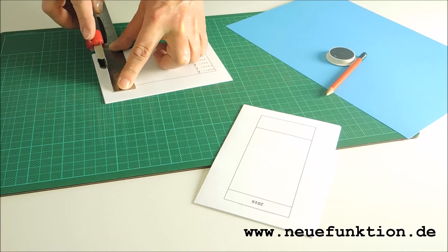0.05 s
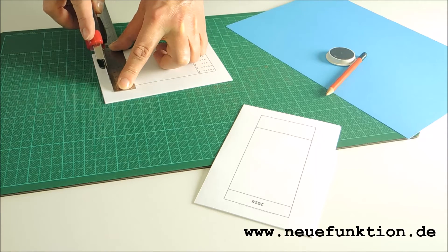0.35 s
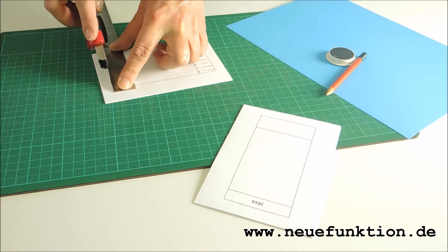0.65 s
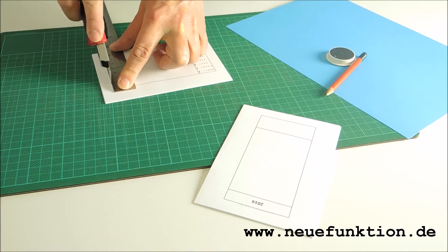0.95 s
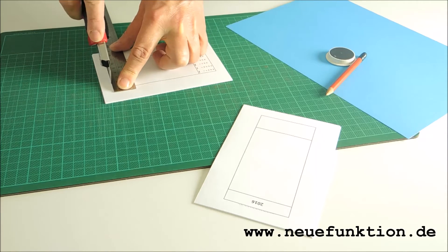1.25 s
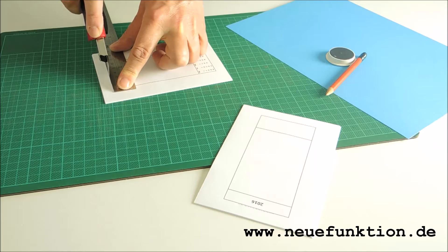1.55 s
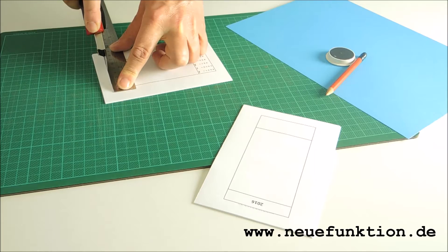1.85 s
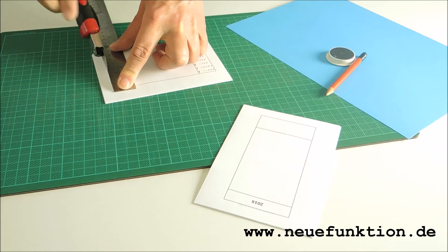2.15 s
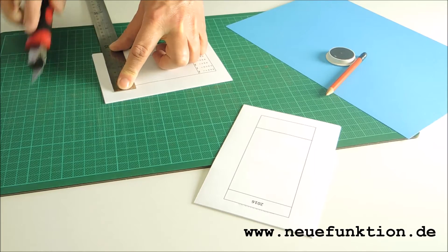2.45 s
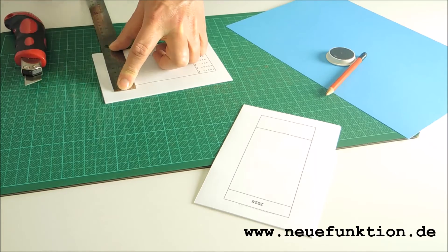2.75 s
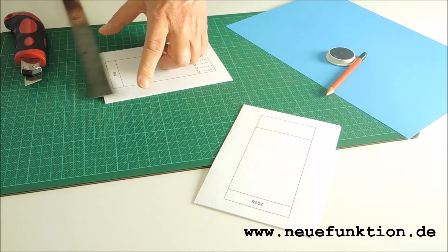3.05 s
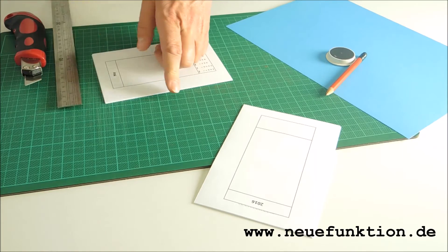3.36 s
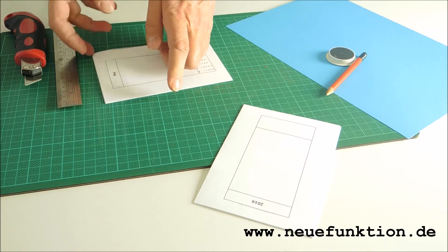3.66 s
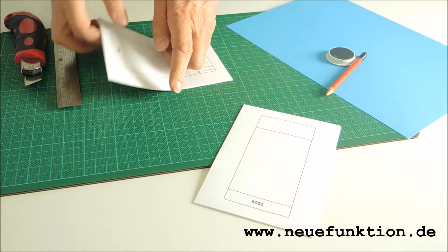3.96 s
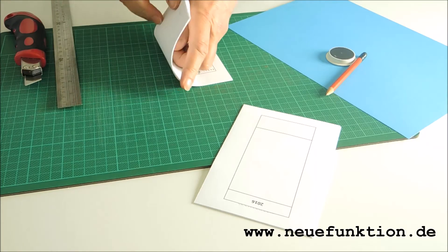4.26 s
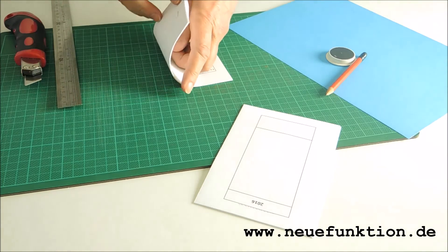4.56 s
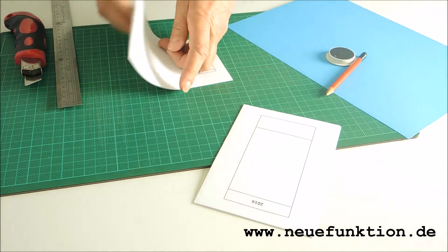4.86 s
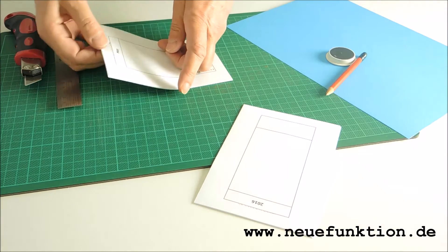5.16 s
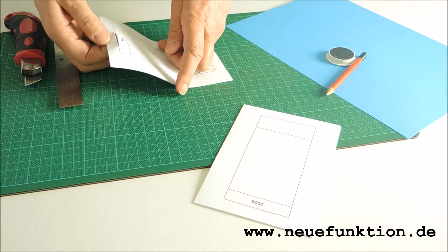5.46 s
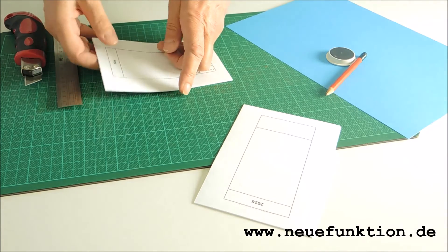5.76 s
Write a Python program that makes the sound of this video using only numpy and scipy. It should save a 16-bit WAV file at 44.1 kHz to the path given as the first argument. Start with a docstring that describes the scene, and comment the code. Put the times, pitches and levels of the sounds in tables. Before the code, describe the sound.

After a few light taps, a utility knife is drawn faintly through paper along a steel ruler. Blade and handle click, then the knife is put down on a cutting mat with a sharp knock that briefly rings the table. The ruler slides aside, rubbing and juddering. The sheet is bent over with two small snaps, crackles and soft finger rustles. The stereo microphone is close, in a lightly echoing room with a fan humming to the left.

```python
"""A small stereo microphone close to a cutting mat, in a lightly echoing room with a fan humming to the left.
After a few light taps a utility knife is drawn along a steel ruler, parting the fibres of a paper sheet.
It bumps off the edge, blade and handle clicking, and is put down at 2.8 s with a knock that rings the table.
The ruler is slid aside, rubbing and juddering. From about 3.9 s the sheet is lifted and bent over:
it snaps free twice, crackles, and rustles under the fingers."""
import sys
import numpy as np
from scipy import signal
from scipy.fft import rfft, irfft
from scipy.io import wavfile

SR = 44100
rng = np.random.default_rng(int(sys.argv[2]) if len(sys.argv) > 2 else 0)


def put_to_file(sound):
    """Save the sound as 16-bit audio at rate SR, in the file named by the first command-line argument."""
    columns = np.atleast_2d(sound).T  # one column per channel
    safe = np.clip(columns, -1, 1)
    whole_steps = np.round(safe * 32767)
    wavfile.write(sys.argv[1], SR, whole_steps.astype(np.int16))


N = 256662
T = np.arange(N) / SR
F = np.fft.rfftfreq(2 * N, 1 / SR)

# room tone, the fan's rush of air: (frequency [Hz], relative level [dB])
FAN_AIR = [(20, -34), (50, -10), (80, -3), (110, -2), (190, -2.5), (270, -2), (400, -6), (800, -5),
           (1500, -5.5), (2000, -10.5), (2800, -13), (4700, -18), (13000, -18), (16000, -20.5)]
# fan and motor lines: (frequency [Hz], level [dB])
FAN_HUM = [(75.2, -71.5), (107.7, -105), (149.5, -75), (297, -73)]
# the fan's whine: (frequency [Hz], width [Hz], relative level [dB])
FAN_WHINE = [(747, 36, 0.5), (3859, 76, -4), (3994, 84, -10.5)]
# wall echoes: (frequency [Hz], relative level [dB], t60 [s])
ROOM_ECHO = [(60, -12, 0.42), (202, 3.5, 0.66), (400, 3, 0.46), (1200, 0.5, 0.44), (2500, -1, 0.42),
             (5500, -7, 0.39), (10000, -9.5, 0.32), (16000, -9.5, 0.27)]
# microphone ports: (frequency [Hz], left minus right [dB], left lead [rad])
MIC_PORTS = [(100, 0, 0.056), (550, 1.5, 0.17), (1100, 0.5, 0.65), (2190, -3, 0.3), (4500, -3, 0.9),
             (7500, -0.5, 0.74), (10300, -6, 0.9), (13000, -9.5, 1.8), (15700, 9, 1.9)]

# rustle of the sheet: (frequency [Hz], relative level [dB])
PAPER_SPECTRUM = [(30, -40), (200, -15), (900, -22), (1700, -16), (3300, -11), (5200, -7), (7000, -3.5),
                  (8500, 1.5), (10500, 2.5), (12300, 4), (14000, 1), (16000, -6.5)]
# resonances of the curved sheet: (frequency [Hz], width [Hz], relative level [dB])
FLEX_MODES = [(2400, 270, 1), (2540, 200, -4), (4230, 610, -0.5)]
# the sheet slips until it snaps free: (time [s], length [s], snap level [dB], flex re snap [dB])
SHEET_SLIPS = [(3.961, 0.0403, -42.5, -7.5), (4.089, .039, -42, -11.5)]
# crackles of the bending sheet: (time [s], level [dB])
SHEET_CRACKLES = [(3.96, -43), (4.030, -47.5), (4.046, -50), (4.078, -41), (4.093, -52), (4.123, -46),
                  (4.179, -51), (4.369, -56)]
# fingers brushing the sheet: (time [s], length [s], level [dB])
FINGER_BRUSHES = [(3.906, 0.21, -57.5), (4.108, .09, -59), (4.349, 0.077, -64.5), (4.408, 0.093, -61.5),
                  (4.618, 0.16, -67.5), (4.991, 0.095, -60), (5.05, 0.15, -58.5), (5.174, 0.15, -66),
                  (5.336, 0.085, -58), (5.48, 0.082, -70), (5.804, .06, -58.5)]
# skin on paper: (frequency [Hz], relative level [dB])
SKIN_SPECTRUM = [(30, -40), (900, -28), (2500, -4), (4500, -1.5), (7000, -4), (9500, 1.5), (12300, 4.5),
                 (14000, -1), (16000, -5)]

# the hand's push on the ruler: (time [s], sliding effort [dB])
RULER_PUSH = [(3.05, -64), (3.084, -58.5), (3.1, -65), (3.114, -52.5), (3.218, -43), (3.252, -47),
              (3.298, -46), (3.388, -62), (3.43, -87)]
# steel rubbing on paper: (frequency [Hz], relative level [dB])
RUB_SPECTRUM = [(30, -30), (130, 2), (250, 3), (1000, 1), (3000, 10), (3800, 5.5), (5100, 6.5), (7000, 3.5),
                (10000, 3), (16000, -23)]
# the ruler's low, upper and edge resonances: (frequency [Hz], width [Hz], relative level [dB])
JUDDER_MODES = [(455, 28, 1), (513, 28, 1.5), (600, 53, -12), (742, 23, 1.5), (826, 62, -3.5),
                (906, 55, -3)]
UPPER_MODES = [(1198, 44, 2.5), (1590, 180, -7), (1958, 27, 2), (2380, 31, 4), (2590, 58, -20),
               (2760, 73, -1.5)]
EDGE_MODES = [(10510, 46, -9), (11050, 67, -4), (11480, 120, -2), (11900, 230, -6), (12270, 40, -14),
              (12550, 140, -4), (13700, 440, -8), (14400, 450, -15), (15300, 500, -17)]
# each voice of the ruler: (level at full push [dB], slope [dB per dB of push], gain on the mat [dB])
JUDDER_LAW = (-55.5, .25, 6.9)
UPPER_LAW = (-52.5, 0.58, 2.3)
RUB_LAW = (-46, 1.06, -6)
EDGE_LAW = (-42, 1.03, 0)

# blade, handle and fingers hit the mat: (time [s], level [dB], tilt [dB/octave], chatter t60 [s])
MAT_BLOWS = [(1.205, -50, 2.5, .01), (2.114, -40, 0.5, .33), (2.219, -49, -6, .02), (2.250, -40, -1, 0.1),
             (2.315, -47.5, -3, .02), (2.694, -35, 4.5, .01), (2.710, -42, -12, 0.18),
             (2.8105, -25, 0, .02), (2.838, -32, 2.5, 0.053), (3.756, -53, -9, .01),
             (3.841, -47.5, -9, 0.18), (3.993, -45, 0, .02)]
# dull knock of the mat: (frequency [Hz], relative level [dB])
KNOCK_SPECTRUM = [(25, -47), (70, -27), (135, 0.5), (230, -1.5), (500, 0.5), (800, -5), (1200, -5),
                  (1800, -35), (3500, -27), (12000, -29.5)]
# the table under the mat: (frequency [Hz], relative level [dB], t60 [s])
TABLE_MODES = [(140.4, -2.5, 0.3), (180.7, -13, 0.66), (224.6, -4, 0.84), (298.5, 2.5, 0.53),
               (351, -3, 0.3), (419, 3.5, 0.42), (484, -1.5, 0.46), (745, -9, 0.32), (834, -3, 0.37),
               (1210, 1, 0.26), (1500, -8, 0.25), (1620, -7, 0.41), (1672, -8, 0.52), (1803, -4, 0.54),
               (2321, 0, 0.36), (2570, 2, 0.38), (2660, -5, .28), (2660, -2, 0.39), (2870, -10, 0.26)]

# knife contacts: (time [s], level [dB], tilt [dB/octave], handle's share [0-1], base t60 [s])
KNIFE_CONTACTS = [(0.274, -41, -5.5, 1, 0.014), (0.683, -35.5, -1.5, 0.74, .012),
                  (1.569, -48, 12, .1, 0.0073), (2.224, -43, 6, .2, .009), (2.250, -32.5, 1, .2, 0.0064),
                  (2.315, -28.5, -.5, 0.33, 0.013), (2.409, -29.5, 3, 0, 0.013),
                  (2.417, -20.5, 2, 0.26, 0.012), (2.427, -32.5, 0, 0, 0.023), (2.694, -23, 3, .2, 0.018),
                  (2.699, -18.5, 1.5, 0.3, 0.0051), (2.71, -23, 13, 0.9, 0.0069),
                  (2.732, -30.5, -2, 0.7, 0.019), (2.8076, -10, -2.5, 1, 0.023),
                  (2.8103, -18, -5.5, 0.8, 0.018), (2.8114, -15, -1, 0.97, 0.015)]
# crack of a contact: (frequency [Hz], relative level [dB])
CRACK_SPECTRUM = [(40, -59), (200, -21.5), (1000, -10), (1600, -5.5), (2500, -5.5), (4300, -2), (6000, -1),
                  (8500, 0.5), (11000, 5.5), (13000, 1), (16000, -5)]
# blade rattling in its steel guide: (frequency [Hz], relative level [dB], ring time [x base t60])
BLADE_MODES = [(1600, -14, 2.5), (2198, -8.5, 2.4), (2557, -6, 1.5), (3180, -5, 1.9), (3670, -8.5, 2.5),
               (5950, -13.5, 1.1), (6960, -13, 2.7), (8660, -5, 0.55), (11780, 3.5, 0.63), (13400, -1, 1)]
# hollow plastic handle: (frequency [Hz], relative level [dB], ring time [x base t60])
HANDLE_MODES = [(1580, -12, 0.77), (1656, -13.5, 2.1), (2530, -15, 1.7), (4890, -3, 0.73),
                (5930, 5.5, 0.54), (7770, -2.5, 1.1), (9860, -1.5, 1), (10500, -10, 1.2), (11800, -6, 2.6)]
# pulls of the blade through the sheet: (time [s], length [s], fibre hiss [dB], rasp [dB])
BLADE_PULLS = [(1.558, .22, -60, -61.5), (1.748, 0.16, -65.5, -71), (1.896, 0.082, -61, -55.5)]
# parting fibres, blade on ruler, tip in the mat: (frequency [Hz], relative level [dB])
FIBRE_SPECTRUM = [(40, -37), (1000, -7), (3000, -2.5), (5000, -0.5), (8500, 1), (11500, 2.5), (16000, -1.5)]
RASP_SPECTRUM = [(40, -40), (500, -6), (900, 4.5), (1200, -1), (1700, -1.5), (2100, -3), (2650, -2),
                 (3300, -6.5), (5000, -28)]
DRAG_SPECTRUM = [(30, -35), (110, -9), (220, 8.5), (380, -5), (550, 6), (750, -3), (1200, -26), (4000, -33)]


def amp(db):
    """Decibels to gain."""
    return 10 ** (np.asarray(db) / 20)


def unit(x):
    """Scale to rms 1."""
    return x / np.sqrt(np.mean(x ** 2))


def over_hz(table, f=F):
    """Each column of a table, joined on a log-frequency axis."""
    hz, *columns = np.transpose(table)
    return [np.interp(np.log(f + 1), np.log(hz), c) for c in columns]


def through(x, response):
    """Filter by a frequency response."""
    return irfft(rfft(x, 2 * N) * response)[..., :N]


def colour(x, points, tilt_db=0):
    """Filter by a (Hz, dB) curve, tilted per octave, at rms 1."""
    f = np.fft.rfftfreq(x.shape[-1], 1 / SR)
    gain_db, = over_hz([(hz, db + tilt_db * np.log2(hz)) for hz, db in points], f)
    return unit(irfft(rfft(x) * amp(gain_db), x.shape[-1]))


def resonate(x, modes):
    """Ring (Hz, width, dB) resonances, at rms 1."""
    response = sum(amp(db) * 1j * F * w / (hz ** 2 - F ** 2 + 1j * F * w) for hz, w, db in modes)
    return unit(through(x, response))


def fade(t, t60):
    """Exponential decay, 60 dB down at t60."""
    return np.exp(-np.log(1000) * t / t60)


def add(track, s, x):
    """Mix a short sound in at time s."""
    i = int(s * SR)
    track[i:i + len(x)] += x[:N - i]


def walk(rate):
    """Slow random wander, spread near 1."""
    knots = rng.standard_normal(1024)
    return np.interp(T * rate, np.arange(len(knots)), knots)


def friction(rate, spread_db, uneven_db):
    """Stick-slip: dense tiny releases of unequal size that come in surges."""
    hit = rng.random(N) < rate / SR
    size = rng.standard_normal(N) * amp(spread_db * np.minimum(rng.exponential(size=N), 5))
    return unit(hit * size * amp(uneven_db * walk(90)))


def diffuse(size, alike_hz):
    """Stereo noise from all around: alike in the bass, unrelated in the treble."""
    mid, side = rfft(rng.standard_normal((2, size)))
    alike = .97 / (1 + (np.fft.rfftfreq(size, 1 / SR) / alike_hz) ** 2)
    pair = mid * np.sqrt(1 + alike) + np.array([[1], [-1]]) * side * np.sqrt(1 - alike)
    return irfft(pair, size) / np.sqrt(2)


def burst(points, tilt_db, t60):
    """A decaying crackle with a smooth (Hz, dB) spectrum, at peak 1."""
    t = T[:SR // 2]
    x = rng.standard_normal(len(t))
    for _ in range(3):  # even out the chance ripple of its spectrum
        bins = rfft(x * fade(t, t60))
        x = colour(irfft(bins / np.abs(bins), len(t)), points, tilt_db)
    x *= np.clip((t[-1] - t) / .1 - 1, 0, 1)
    return x / np.abs(x).max()


def stroke(s, length):
    """One stroke of the hand: from rest, over a broad top, to rest again."""
    u = np.clip((T - s) / length, 0, 1)
    return (4 * u * (1 - u)) ** .75


def fan():
    """Room tone: a steady rush of air and a narrow whine off to the left, over a wavering hum."""
    air = amp(-62) * colour(diffuse(N, alike_hz=1480), FAN_AIR)
    hum = np.zeros(N)
    for hz, db in FAN_HUM:
        peak = np.sqrt(2) * amp(db + 3.4 * walk(7))
        waver = .71 * np.sqrt(hz / 75) * walk(5.3)
        hum += peak * np.sin(2 * np.pi * hz * T + waver)
    whine = amp(-70) * resonate(diffuse(N, alike_hz=2960), FAN_WHINE)
    left_db, = over_hz([(120, 2.9), (500, 4.7), (4000, 4.6), (8000, .5)])
    return through(air + whine, amp(np.array([[.5], [-.5]]) * left_db)) + hum


def room(x):
    """Wall echoes reach the microphone a few milliseconds late and die sooner in the treble."""
    size = SR // 2
    f, t, cells = signal.stft(diffuse(size, alike_hz=3200), SR, nperseg=256)
    db, t60 = (c[:, None] for c in over_hz(ROOM_ECHO, f))
    decay = fade(t, t60) * np.sqrt(2 * np.log(1000) / (t60 * SR))  # same energy at any t60
    tail = signal.istft(cells * amp(db) * decay, SR)[1][:, :size]
    onset = np.clip((T[:size] - .005) / .0063, 0, 1)
    return signal.fftconvolve(x[None], 1.22 * tail * onset, axes=1)[:, :N]


def microphone(x):
    """The two ports pick up the close sound with different level and delay."""
    pan_db, lead = over_hz(MIC_PORTS)
    side = np.array([[.5], [-.5]])
    return through(x, amp(side * pan_db) * np.exp(1j * side * lead))


def paper_lift():
    """The sheet slips and snaps free, ringing its curve; it crackles and fingers brush it as it bends."""
    slip_rise, flex_rise = 210, 300  # dB/s; the flex rises on top of the slip
    slip, flex, age = np.zeros(N), np.zeros(N), T[:SR // 8]
    for s, length, db, flex_db in SHEET_SLIPS:
        to_snap = np.maximum(length - age, 0)
        swell = amp(db - slip_rise * to_snap) * (1 - fade(age, .0056))
        push = swell * fade(np.maximum(age - length, 0), t60=.023)
        add(slip, s, push)
        add(flex, s, amp(flex_db - flex_rise * to_snap) * push)
    for s, db in SHEET_CRACKLES:
        push = amp(db) * fade(age, t60=.019)
        add(slip, s, push)
        add(flex, s, amp(-17) * push)
    grit = friction(rate=24000, spread_db=-.8, uneven_db=1.6)
    touch = sum(amp(db) * stroke(s, length) for s, length, db in FINGER_BRUSHES)
    fingers = touch * colour(friction(rate=18000, spread_db=2.5, uneven_db=1.5), SKIN_SPECTRUM)
    return slip * colour(grit, PAPER_SPECTRUM) + flex * resonate(grit, FLEX_MODES) + fingers


def ruler_gain(law):
    """Gain of one voice of the ruler, from the push and from how far it lies on the grippy mat."""
    db, slope, mat_db = law
    full_push_db, mat_from_s, crossing_s = -43.5, 3.154, .19
    times, effort_db = np.transpose(RULER_PUSH)
    push_db = np.interp(T, times, effort_db) - full_push_db
    on_mat = np.clip((T - mat_from_s) / crossing_s, 0, 1)
    moving = np.clip(np.minimum(T - times[0], times[-1] - T) / .018, 0, 1) ** 2
    return moving * amp(db + slope * push_db + mat_db * on_mat)


def ruler_slide():
    """The steel strip rubs over paper and judders on the mat, ringing its bending modes and its edge."""
    grip = friction(rate=12000, spread_db=.5, uneven_db=2.1)
    judder = ruler_gain(JUDDER_LAW) * resonate(grip, JUDDER_MODES)
    upper = ruler_gain(UPPER_LAW) * resonate(grip, UPPER_MODES)
    rub = ruler_gain(RUB_LAW) * colour(grip, RUB_SPECTRUM)
    edge = ruler_gain(EDGE_LAW) * resonate(grip, EDGE_MODES)
    return judder + upper + rub + edge


def mat_bumps():
    """Each blow knocks on the mat and rebounds; heavy ones make the table beneath swell into a ring."""
    bounce_s, heavy_db = .011, -25
    knocks, table, t = np.zeros(N), np.zeros(N), T[:SR]
    for s, db, tilt_db, chatter_t60 in MAT_BLOWS:
        rebounds = bounce_s * np.cumsum(rng.uniform(.7, 1.3, size=4))
        for lag in [0, *rebounds]:
            knock = burst(KNOCK_SPECTRUM, tilt_db, t60=.0636)
            add(knocks, s + lag, amp(db) * fade(lag, chatter_t60) * knock)
        modes = sum(amp(mode_db) * np.sin(2 * np.pi * (hz * t + rng.random())) * fade(t, t60)
                    for hz, mode_db, t60 in TABLE_MODES)
        ring_db = -40.5 + 2.25 * (db - heavy_db)
        add(table, s, amp(ring_db) * modes * (1 - fade(t, .04)))
    return knocks, table


def knife_ring(modes, tilt_db, t60):
    """Short ring of a knife part; each contact detunes it a little."""
    t, ring = T[:SR // 2], 0
    for hz, db, life in modes:
        detuned_hz = hz * (1 + .022 * rng.standard_normal())
        tone = np.sin(2 * np.pi * (detuned_hz * t + rng.random()))
        ring += amp(db + tilt_db * np.log2(hz / 6000)) * tone * fade(t, t60 * life)
    return ring * (1 - fade(t, .0035))


def knife_clicks():
    """Hard contacts crack and ring the blade and handle; gives the direct sound and the room's share."""
    direct, to_room = np.zeros(N), np.zeros(N)
    for s, db, tilt_db, share, t60 in KNIFE_CONTACTS:
        blade = np.sqrt(1 - share) * knife_ring(BLADE_MODES, tilt_db, t60)
        handle = np.sqrt(share) * knife_ring(HANDLE_MODES, tilt_db, t60)
        crack = burst(CRACK_SPECTRUM, tilt_db, t60 * 1.84)
        add(direct, s, amp(db) * (amp(-8.5) * blade + amp(-10) * handle + crack))
        # the walls hear the knife from all sides, which evens out its resonances
        add(to_room, s, amp(db) * (amp(-8.5) * blade + amp(-15.5) * handle + amp(5) * crack))
    return direct, to_room


def knife_cut():
    """The blade parts paper fibres, rasps along the ruler and drags its tip through the mat."""
    fibres = colour(friction(rate=11000, spread_db=-.5, uneven_db=1), FIBRE_SPECTRUM)
    rasp = colour(friction(rate=4000, spread_db=-1, uneven_db=4), RASP_SPECTRUM)
    drag = amp(-65.5) * colour(friction(rate=1700, spread_db=0, uneven_db=.5), DRAG_SPECTRUM)
    return sum(stroke(s, length) * (amp(hiss_db) * fibres + amp(rasp_db) * rasp + drag)
               for s, length, hiss_db, rasp_db in BLADE_PULLS)


def scene():
    """The handwork close to the microphone, with the room's echo and the fan behind it."""
    clicks, clicks_to_room = knife_clicks()
    knocks, table = mat_bumps()
    cut, ruler, sheet = knife_cut(), ruler_slide(), paper_lift()
    close = clicks + knocks + table + cut + ruler + sheet
    # what lies flat on the mat throws less sound into the room than the raised sheet
    to_room = clicks_to_room + amp(-1.5) * (knocks + cut) + amp(-4) * ruler + amp(-.5) * sheet
    return microphone(close) + room(to_room) + fan()


def record(dry):
    """The recorder cuts the treble steeply above 15.9 kHz."""
    return signal.sosfilt(signal.ellip(10, .2, 75, 15900, fs=SR, output="sos"), dry)


dry = scene()
out = record(dry)
put_to_file(out)
```